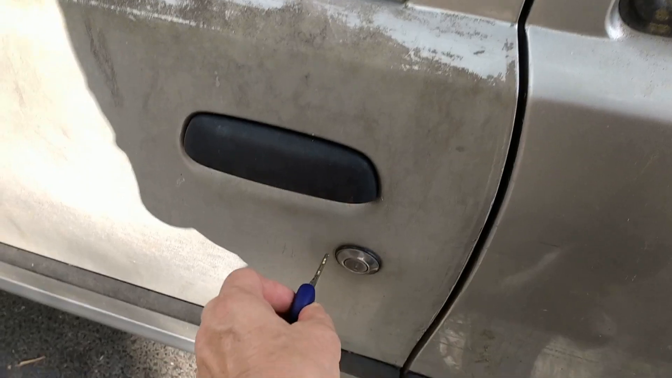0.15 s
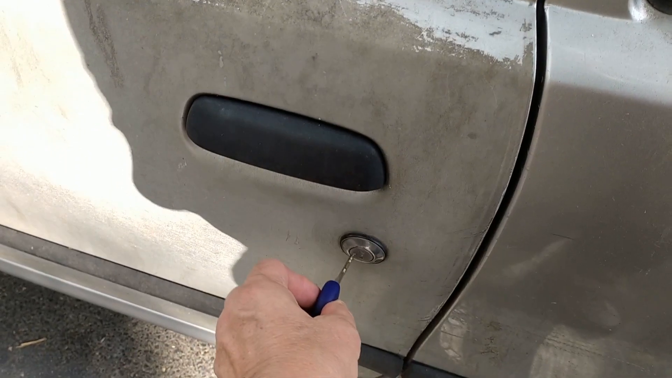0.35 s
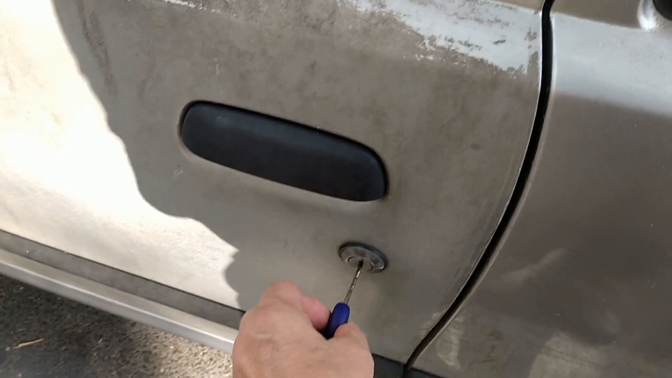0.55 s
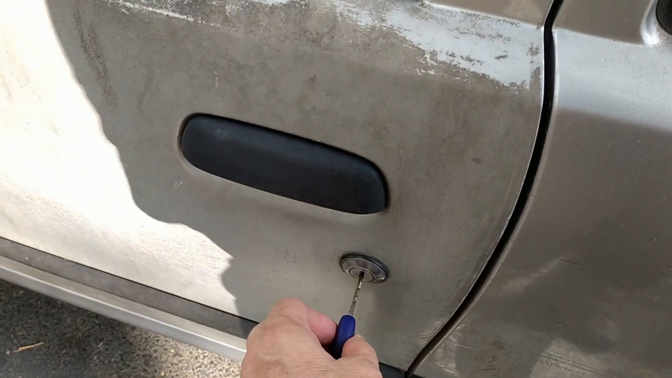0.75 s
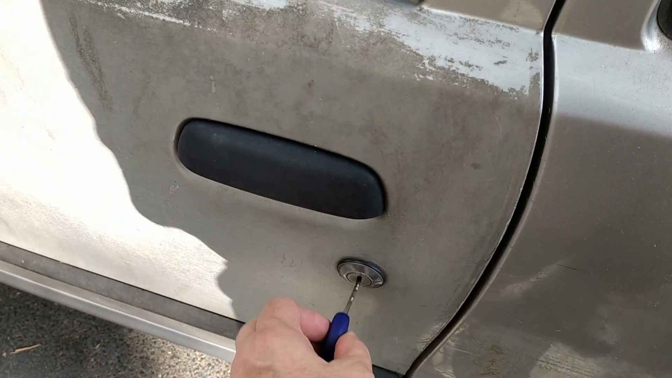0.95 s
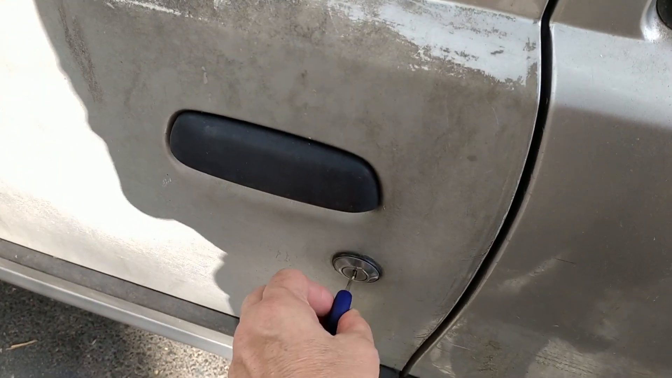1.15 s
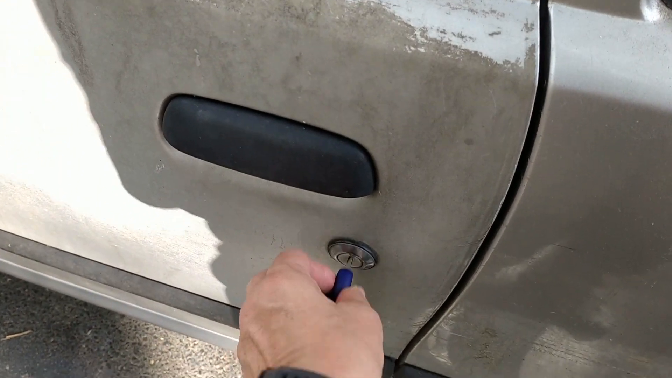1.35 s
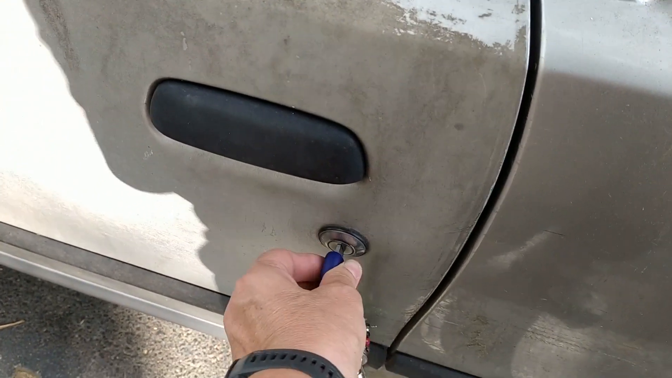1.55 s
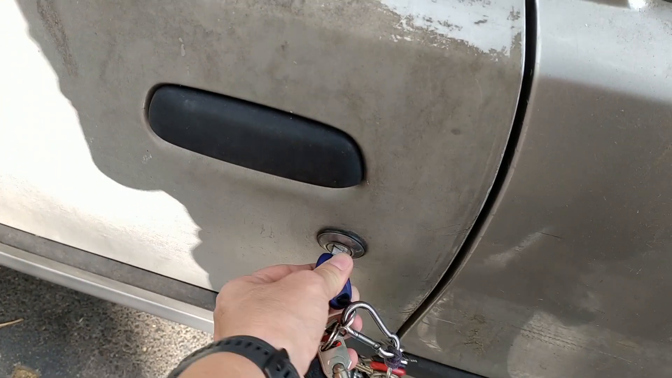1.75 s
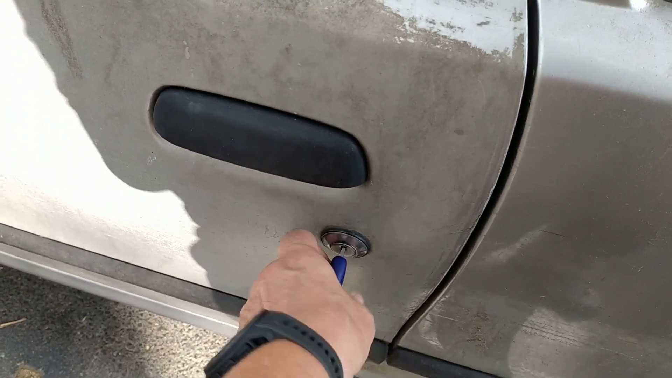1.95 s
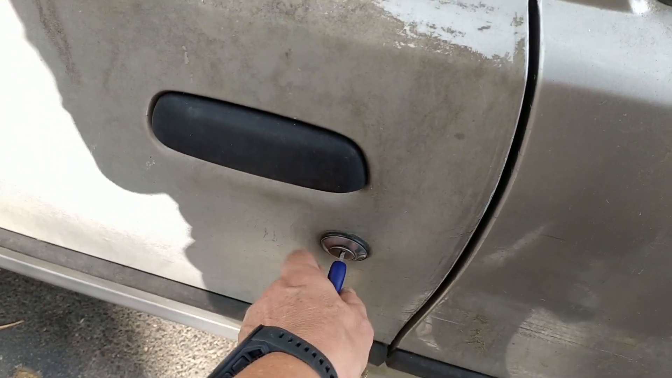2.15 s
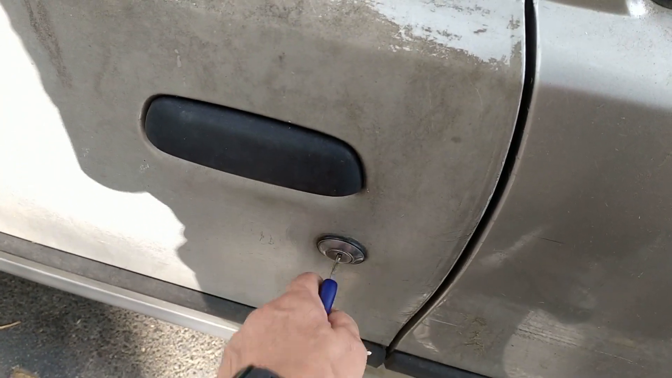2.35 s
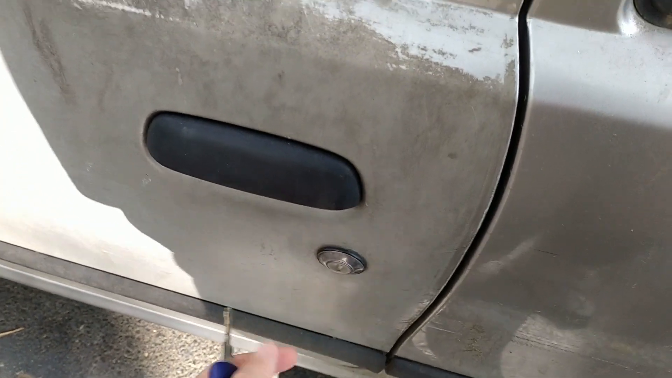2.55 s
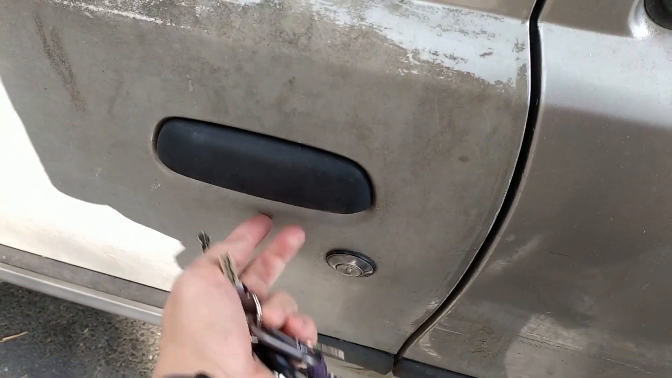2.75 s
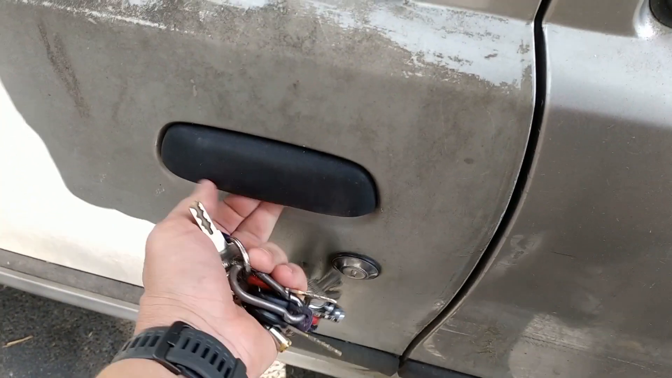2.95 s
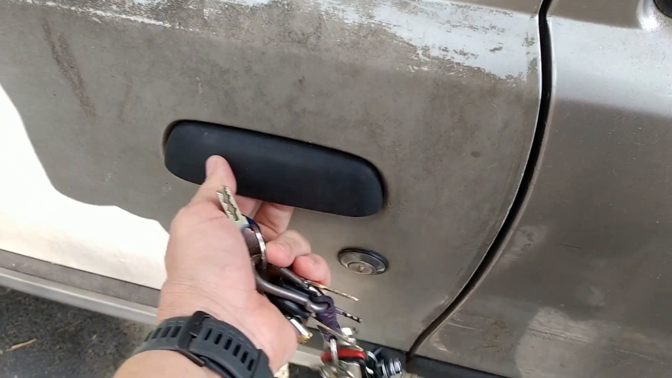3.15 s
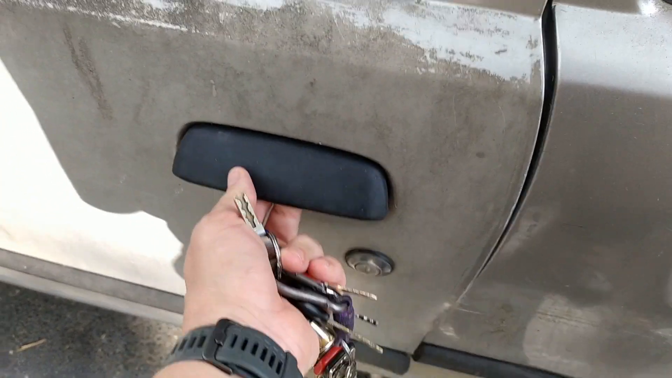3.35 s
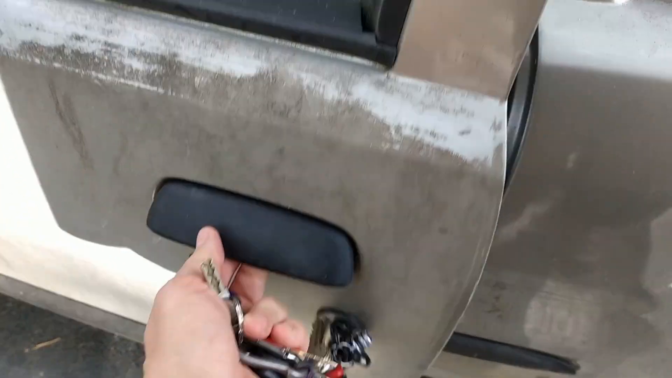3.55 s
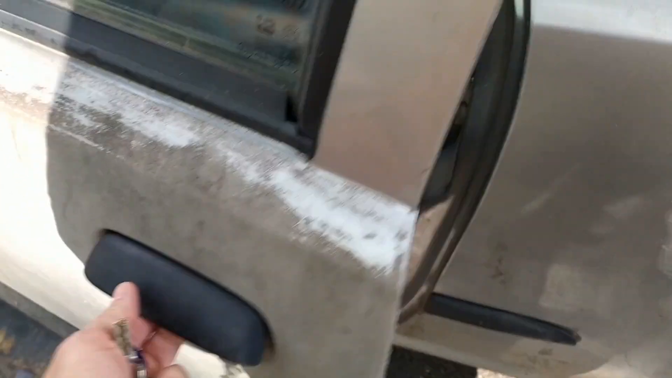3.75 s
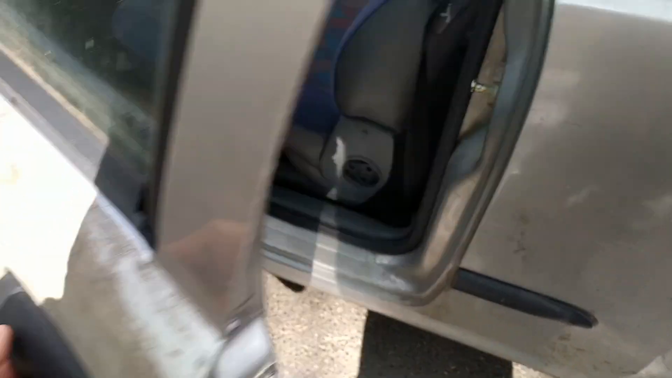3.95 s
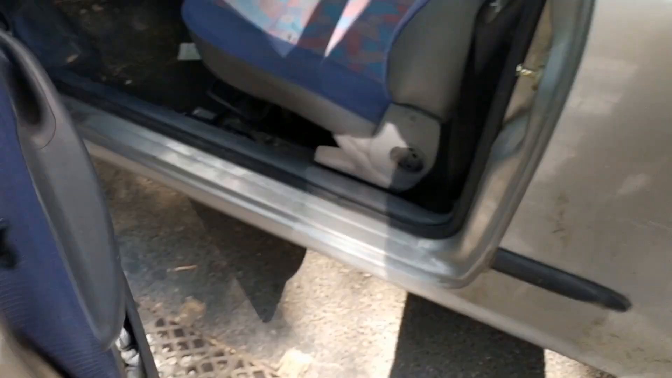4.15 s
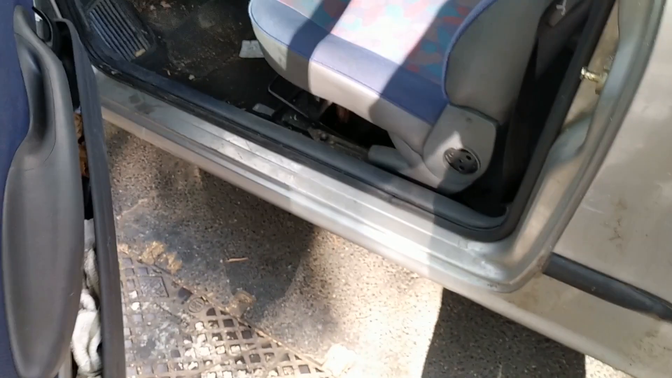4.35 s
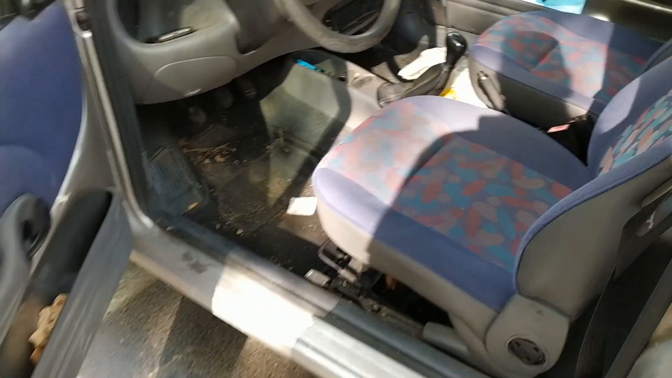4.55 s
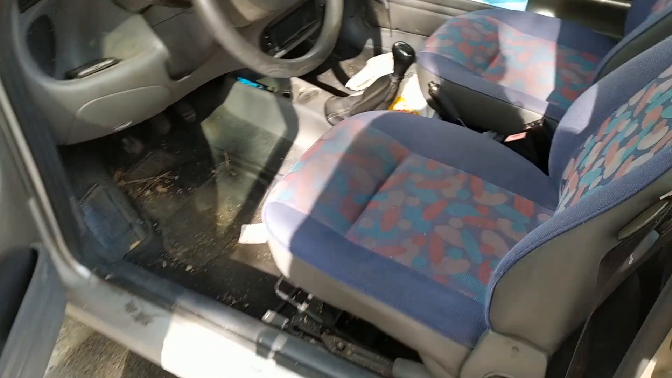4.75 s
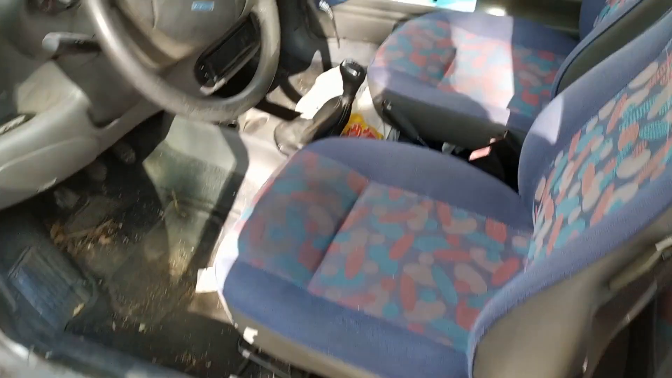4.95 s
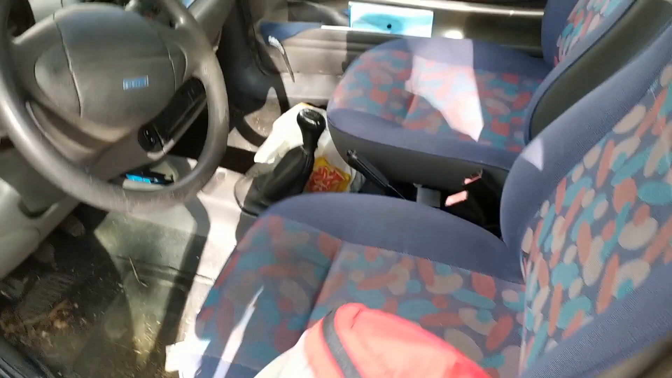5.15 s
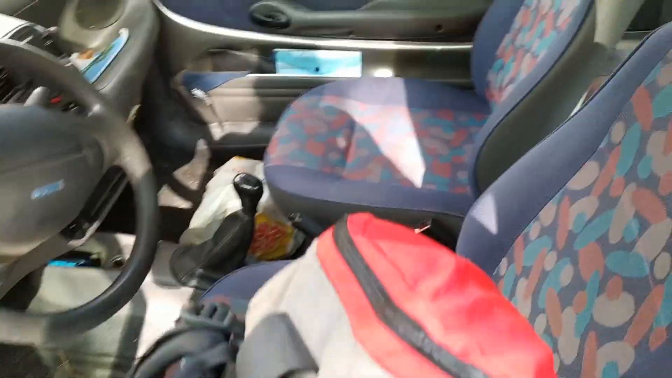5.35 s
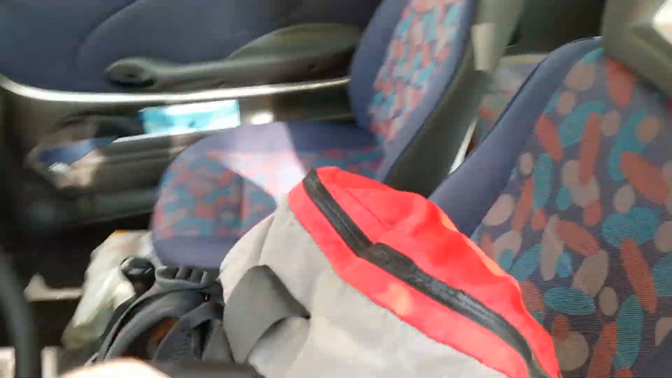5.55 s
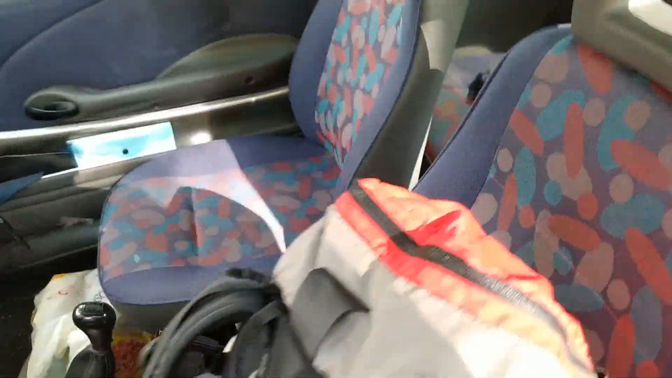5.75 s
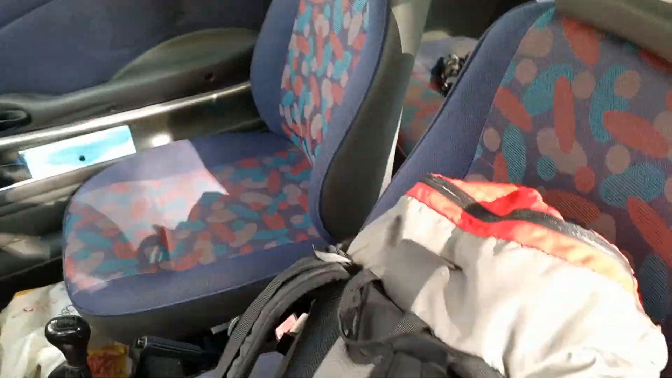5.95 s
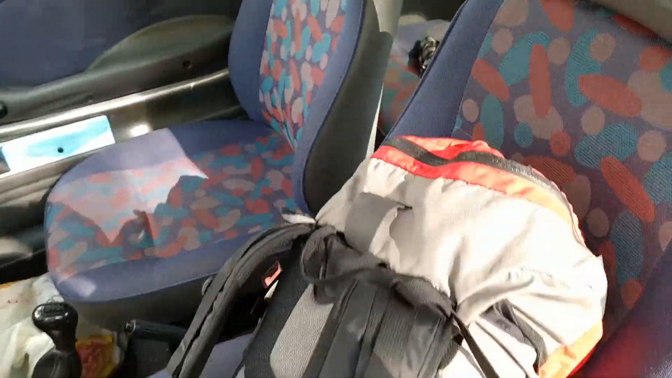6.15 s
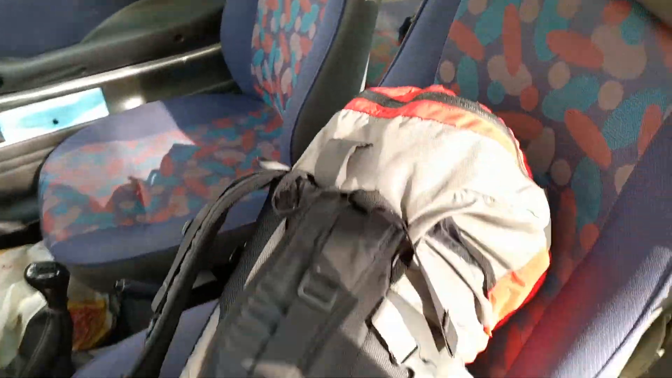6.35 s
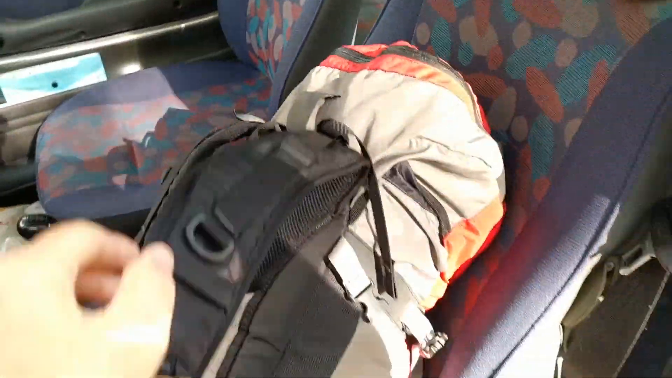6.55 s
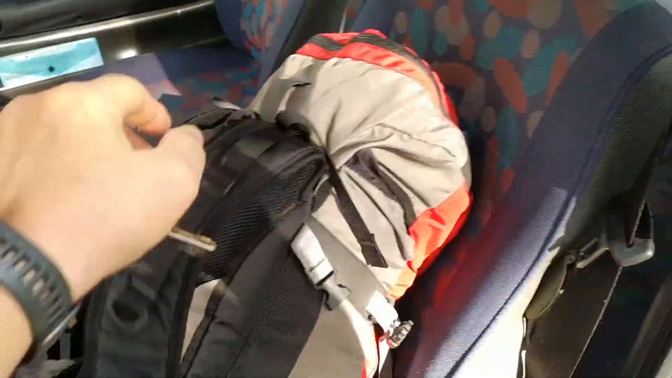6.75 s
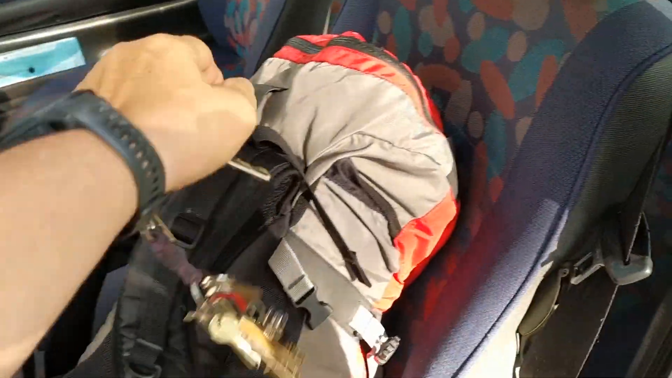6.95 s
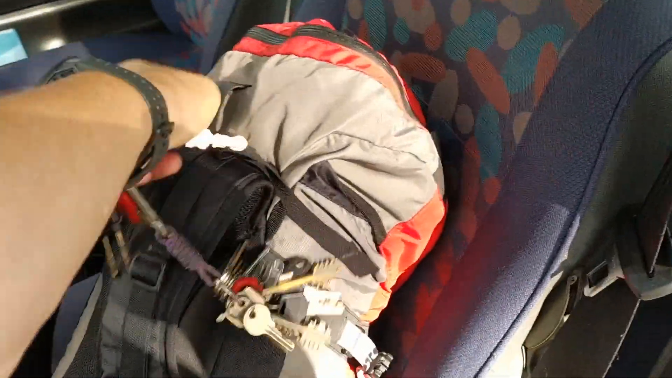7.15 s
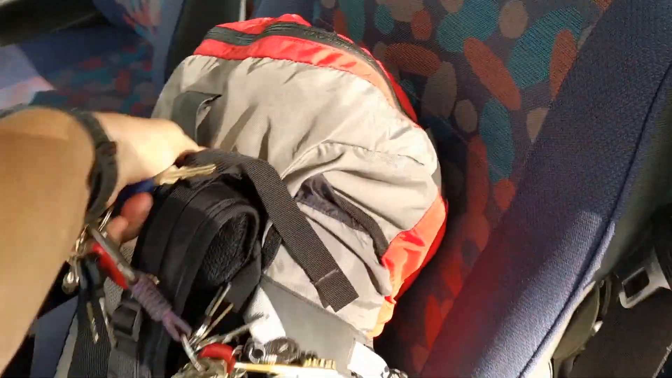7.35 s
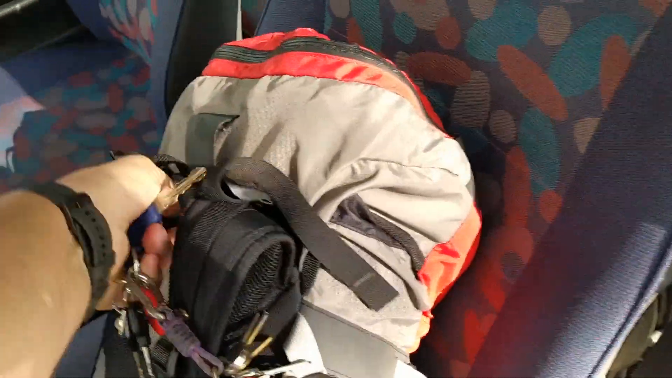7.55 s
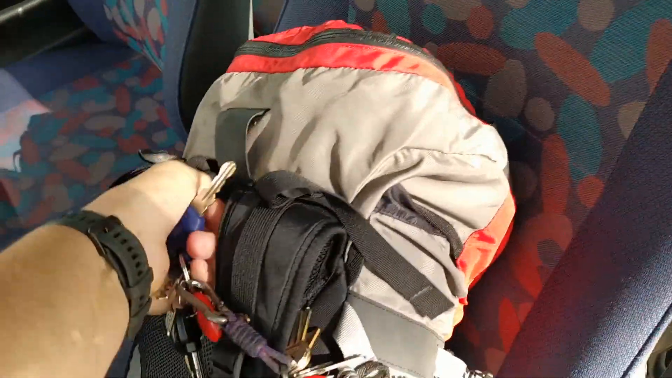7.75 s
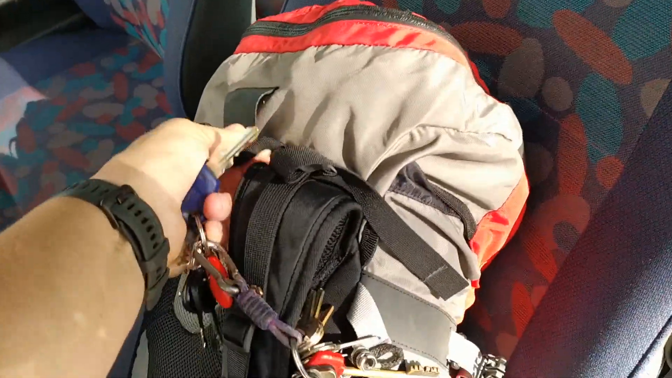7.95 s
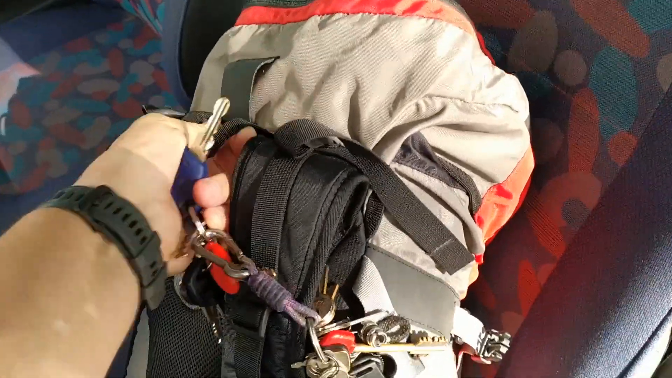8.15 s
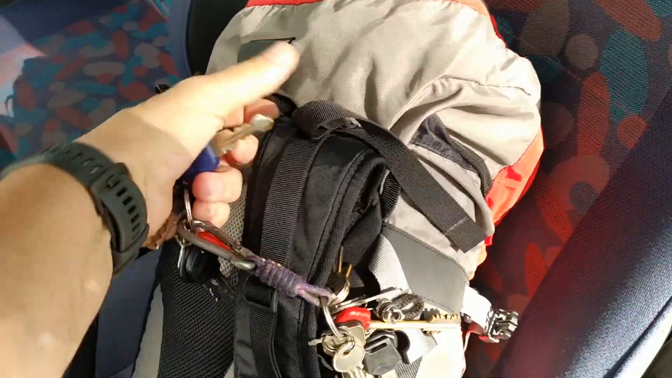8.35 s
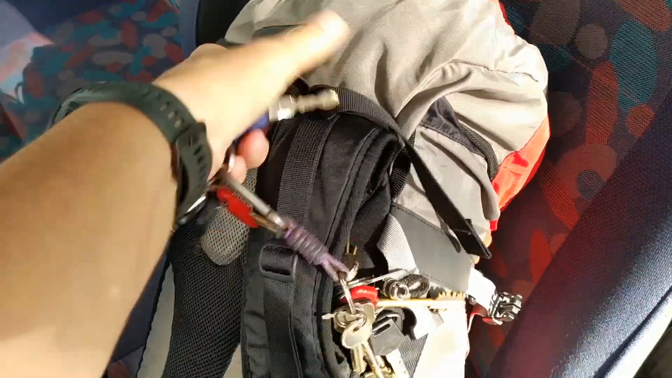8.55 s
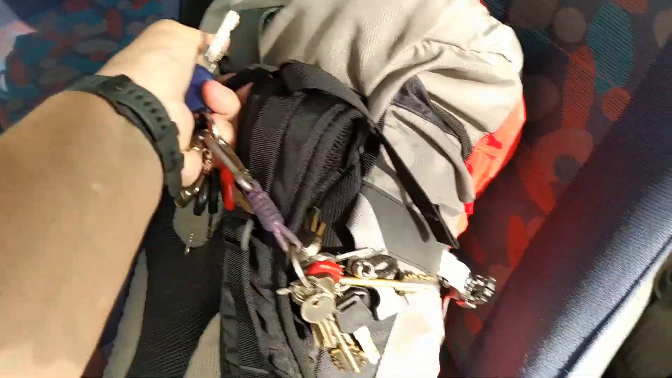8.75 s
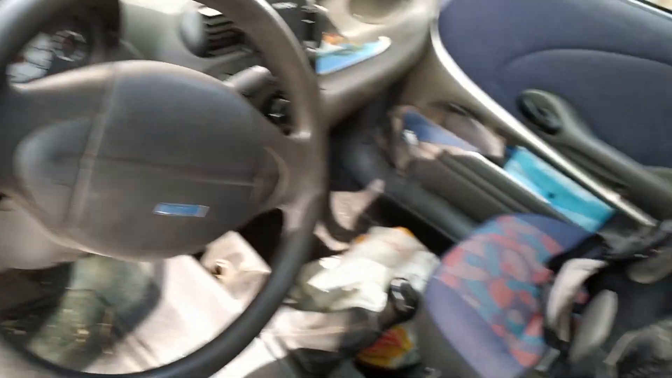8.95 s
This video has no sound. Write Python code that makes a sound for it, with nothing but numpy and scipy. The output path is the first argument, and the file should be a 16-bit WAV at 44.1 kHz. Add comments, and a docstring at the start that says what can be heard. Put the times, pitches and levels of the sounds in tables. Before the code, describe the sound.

A key ratchets into a car door lock and out, the handle clunks, the door booms open, then a seat catch snaps and keys jangle.

```python
"""At a parked car, a key slides into the door lock, turns and is drawn out; the handle trips the latch.
The door booms off its seal and swings through its check strap: touches excite sets of decaying modes.
A seat catch snaps, then a bunch of keys jangles against a rucksack, with many touches at different spots.
Swells of coloured noise make the arm, cloth and padding. Distant traffic, drone, wash and hiss as noise,
lies under it all; drone and wash, the drone most, drop on entering the car."""
import sys
import numpy as np
from scipy import signal
from scipy.fft import rfft, irfft, next_fast_len
from scipy.io import wavfile
from scipy.ndimage import uniform_filter1d

SR = 44100
rng = np.random.default_rng(int(sys.argv[2]) if len(sys.argv) > 2 else 0)


def output_pcm(signal):
    """Save a mono or channel-first signal as 16-bit PCM at the path in sys.argv[1].

    Samples are clipped to [-1, 1] before scaling.
    """
    pcm = np.clip(np.atleast_2d(signal).T, -1, 1) * 32767
    wavfile.write(sys.argv[1], SR, np.round(pcm).astype(np.int16))


N = 396089

# All table levels are relative: the sources trim them in the mix.
# The key tip finds the slot, then the blade snaps past the wafers, in and out.
# Each row: time in seconds, steel level in dB, barrel and panel level in dB, rattle in seconds.
LOCK_CLICKS = [(0.574, -46.5, -44.5, 0.0036), (1.109, -38, -49, .003), (1.124, -38, -46, .004),
               (1.248, -35.5, -40, 0.0041), (1.292, -31, -37, .005), (1.364, -32, -32, .004),
               (1.374, -45, -47, .003), (1.393, -30.5, -40, 0.0021), (1.412, -38, -41, 0.006),
               (1.446, -32, -44, 0.011), (1.467, -26, -24, 0.0031), (1.475, -43, -32.5, .005),
               (1.546, -31.5, -43.5, .003), (2.32, -33, -42.5, .003), (2.365, -39, -49, .002),
               (2.395, -40, -50, .002), (2.41, -33, -48, 0.0039), (2.428, -25, -38, 0.0056),
               (2.443, -33, -40, 0.0033), (2.467, -39, -50, .003), (2.488, -38, -49, .003),
               (2.521, -42, -48, .003)]
# The key blade grinds in and out past the wafers.
# Each row: start and end in seconds, steel grit, barrel and lock panel levels in dB.
BLADE_SCRAPES = [(1.108, 1.208, -77, -50, -41), (1.218, 1.602, -70, -57, -36), (1.38, 1.492, -59, -46, -45),
                 (2.388, 2.541, -35.5, -44, -39)]
# Lock, handle, latch and check strap hit their stops.
# Each row: time in seconds, steel, mechanism and door skin levels in dB, rattle in seconds.
DOOR_KNOCKS = [(2.01, -32.5, -33.5, -23, 0.012), (3.002, -14, -26, -33, 0.003),
               (3.0027, -18.5, -17, -25, 0.0011), (3.009, -22, -18.5, -12, 0.0051),
               (3.018, -16, -25.5, -17, 0.0075), (3.0325, -20, -19.5, -8.5, 0.0048),
               (3.041, -21, -25, -20, 0.0036), (3.051, -28, -32, -14.5, 0.015),
               (3.145, -30, -37, -53, 0.0082), (3.181, -33, -33, -26, 0.015),
               (3.573, -20.5, -26.5, -26, 0.002), (3.578, -29, -36, -40, .003),
               (3.584, -42, -26, -34, 0.0051), (3.595, -27.5, -38, -44, 0.0056),
               (3.604, -42, -35.5, -38, 0.007), (3.622, -31, -43, -38, 0.0041),
               (3.631, -32, -39, -26, 0.0064), (3.645, -36, -41, -33, 0.017), (4.14, -30, -44, -52, 0.002),
               (4.153, -37, -50, -47, .001), (4.1615, -20.5, -32.5, -39, 0.0029),
               (4.1665, -25, -33.5, -30, 0.0038), (4.176, -33, -31, -25, 0.0088),
               (4.197, -21.5, -28, -19, 0.0017), (4.202, -36, -33.5, -19, 0.003)]
# The door leaves its rubber seal. Each row: time in seconds, level in dB.
SEAL_RELEASES = [(3.362, -3)]
# Single touches of key on key. Each row: time in seconds, level in dB.
KEY_TICKS = [(1.757, -26), (1.964, -24), (1.99, -22), (2.1808, -29), (2.624, -31), (2.666, -21.5),
             (2.7275, -24), (2.792, -21), (5.252, -23), (6.245, -16.5), (6.4365, -22), (6.455, -16.5),
             (6.524, -23.5), (7.0792, 2), (7.092, -8), (7.115, -8), (7.128, -14), (7.217, -8), (7.333, -20),
             (7.433, -27), (7.574, -30), (7.8304, -22.5), (8.269, -36), (8.356, -34), (8.463, -29.5),
             (8.4966, -31), (8.507, -26), (8.633, -29), (8.671, -36), (8.7196, -31.5)]
# The whole bunch swings together and rattles out.
# Each row: time in seconds, level in dB, rattle in seconds, ring of the free-hanging keys in dB.
KEY_JANGLES = [(2.636, -22.5, 0.014, -24), (3.0642, -14, 0.015, -9), (3.177, -13, 0.015, -23),
               (3.6206, -12.5, 0.02, -14), (5.951, -36, .02, -14), (6.073, -23.5, 0.036, -16),
               (6.147, -29, 0.076, -17), (6.207, -26.5, 0.017, -1), (6.447, -16, 0.0065, -0.5),
               (6.461, -20, .009, 1), (6.638, -28.5, 0.052, -19), (6.717, -20.5, 0.037, -19),
               (6.879, -15, 0.014, -19), (7.0655, -8.5, 0.0031, -13), (7.084, -18, .011, -6),
               (7.103, -7.5, 0.048, -15), (7.158, -20, 0.021, -4), (7.179, -16.5, 0.052, -0.5),
               (7.216, -16, .007, -2), (7.252, -26, 0.013, 0), (7.286, -19, 0.023, 1.5),
               (7.3096, -17.5, .009, -1), (7.358, -23, .005, -4), (7.367, -16.5, 0.0087, -11),
               (7.447, -27, 0.016, -3), (7.483, -19, 0.011, -10), (7.5067, -16.5, 0.013, -15)]
# The steel clip of the bunch pings. Each row: time in seconds, level in dB.
CLIP_PINGS = [(2.0206, -40), (2.2767, -31.5), (2.3201, -34), (2.3654, -45)]
# The long key pings while the bunch dangles. Each row: time in seconds, level in dB.
LONG_KEY_PINGS = [(7.105, -35), (7.152, -39), (7.178, -28), (7.22, -36), (7.289, -37), (7.312, -35),
                  (7.367, -39), (7.451, -44)]
# Two loose keys chatter as the door comes to rest.
# Each row: time in seconds, level in dB, rattle in seconds.
KEY_CHATTER = [(4.392, -37, 0.024), (4.4094, -30, 0.014), (4.427, -21.5, 0.0074), (4.441, -19.5, 0.011)]
# Where the bunch hangs. Each row: time in seconds, left-right difference in dB.
KEYS_PAN = [(2.0, 4.5), (3.6, 2), (5.25, -8.5), (6.15, 5.5), (6.9, -1), (7.1, -0.5), (7.25, 1.5),
            (7.8, 7.5), (8.4, -10)]
# The seat catch is pressed, snaps and settles.
# Each row: time in seconds, steel, mechanism and frame levels in dB, rattle in seconds.
CATCH_SNAPS = [(5.374, -55, -39, -39, 0.0041), (5.393, -11.5, -18.5, -53, 0.0048),
               (5.471, -37, -59, -70, 0.0024)]
# Plastic buckles of the rucksack knock or are hit.
# Each row: time in seconds, click, buckle and seat frame levels in dB, rattle in seconds.
BUCKLE_KNOCKS = [(5.655, -29, -36.5, -35.5, 0.011), (5.757, -26.5, -37.5, -38.5, 0.004),
                 (6.716, -29, -46.5, -55, .002), (6.868, -33, -35, -48, 0.0043),
                 (7.0825, -15.5, -27.5, -30, 0.0035), (7.094, -19, -33, -36, 0.009)]
# Rucksack fabric and straps are pushed about. Each row: time in seconds, swish and thud levels in dB.
CLOTH_PUSHES = [(5.658, -53, -32), (5.761, -44, -47), (5.885, -58, -41), (5.947, -62, -36),
                (6.041, -46.5, -38.5), (6.085, -51, -48), (6.885, -42, -50), (6.94, -46, -48),
                (7.355, -48, -43.5), (7.734, -47, -57), (7.874, -46.5, -40), (8.457, -50, -60),
                (8.565, -48, -48)]
# Arm movements: key in, turn and withdraw, reach for the handle, pull, swing the door, let go, lean in,
# reach for the rucksack, pull it closer, drop the bunch on it, feel along the straps.
# Each row: start and end in seconds, rumble, rubbing and shuffle levels in dB.
MOVES = [(1.05, 1.875, -61, -49, -59), (1.884, 2.91, -52.5, -50, -59), (2.81, 3.332, -54, -47, -46.5),
         (3.352, 4.027, -73, -47, -54), (4.096, 4.503, -67, -49.5, -62), (4.56, 4.726, -78, -73, -49),
         (5.07, 5.68, -84, -55, -49.5), (5.75, 6.517, -60, -54, -48.5), (6.393, 6.86, -47, -61, -54),
         (6.883, 7.62, -57, -51.5, -43.5), (7.48, 9.29, -59.5, -61, -54.5)]

# Crowds of close modes in each struck part. Each row: frequency in Hz, level in dB per Hz.
SKIN_CROWD = [(59, -48), (100, -57), (209, 1), (295, -7.5), (406, -3.5), (453, -17), (498, -5.5),
              (650, -11), (840, -15), (1430, -120)]
MECHANISM_CROWD = [(320, -23), (550, -10.5), (698, -17), (780, 1.5), (886, -3), (1300, -3.5), (1860, 0.5),
                   (2250, -2.5), (2600, 1), (3050, -11.5), (4200, -13.5), (5460, -21), (9240, -120)]
BARREL_CROWD = [(320, -25), (600, -14), (1000, 1), (1300, -1), (1900, -9), (2200, 0), (2600, -9),
                (3100, -15), (4200, -18), (9000, -70)]
# The panel around the lock, with the same columns: frequency in Hz, level in dB per Hz.
MOUNT_CROWD = [(70, -38), (130, 1), (195, 3), (290, -6), (400, -5), (520, -34), (1000, -60)]
STEEL_CROWD = [(2240, -18.5), (3800, -2.5), (5290, -1.5), (7360, 3.5), (8060, 1), (8720, 6), (10400, 6),
               (12500, -7.5), (13700, -10), (16000, -29)]
SEAL_CROWD = [(59, -30), (110, -14), (260, 2), (440, -7), (570, -10), (830, 5.5), (1060, -13), (1400, -6.5),
              (2130, -6.5), (3120, -34), (4980, -21), (5770, -28), (9410, -23.5), (10200, -14),
              (13500, -53)]
# The deep boom of the whole door shell, again: frequency in Hz, level in dB per Hz.
BOOM_CROWD = [(15, -30), (35, -7), (85, 3), (120, -9), (190, -2), (290, -17), (450, -22), (900, -38),
              (2000, -80)]
CATCH_CROWD = [(250, -23), (550, -12.5), (1120, 4.5), (1650, -5), (2250, -1), (3000, -7), (3500, -10),
               (6000, -40)]
KEYS_CROWD = [(3240, -8), (5500, -34), (5920, -14), (7550, 1), (8240, -1.5), (10300, 4.5), (11200, 2.5),
              (12500, -10), (13100, -29), (16100, -41), (16500, -36)]

# Resonances that stand out. Each row: frequency in Hz, width in Hz at damping 1, level in dB.
SKIN_MODES = [(172, 22, -5), (202, 24, 0), (285, 28, -5), (419, 34, 0), (490, 24, 4)]
SHELL_MODES = [(68, 7, 4), (88, 12, 6), (165, 14, -3), (199, 15, 1), (232, 16, -4), (293, 34, -4),
               (405, 26, -6), (460, 30, -10), (673, 40, -8), (832, 45, -7)]
MECHANISM_MODES = [(540, 50, -7), (830, 60, -2), (1090, 130, -9), (1270, 110, 0), (1412, 24, 3),
                   (1668, 35, -2), (2200, 45, -1), (2270, 24, 3), (2501, 27, 1), (2587, 35, -4),
                   (2723, 20, -2), (3950, 150, -16), (4260, 130, -15)]
CATCH_MODES = [(1146, 70, 2), (1370, 85, -10), (2205, 99, 1), (2320, 94, -5)]
BARREL_MODES = [(1270, 110, 0), (1412, 30, -1), (2230, 90, -2)]
MOUNT_MODES = [(194, 50, 0), (393, 28, -5)]
STEEL_MODES = [(5500, 72, -48), (7600, 210, -2), (7960, 38, -41), (8950, 51, -1), (11300, 32, 14),
               (11150, 340, 30), (10840, 44, 32), (13000, 140, -4), (12300, 140, 30), (14800, 55, 0)]
KEY_MODES = [(6790, 50, 0), (7450, 40, -5), (8007, 30, -2), (8270, 25, 3), (8445, 40, -3), (8545, 40, -1),
             (8645, 40, -2), (8872, 35, 0), (9010, 45, 0), (9300, 70, -3), (9845, 35, 0), (9961, 40, -1),
             (10432, 40, -2), (10799, 13, 10), (10913, 18, 6), (10969, 25, 1), (11327, 18, 7),
             (11799, 30, -2), (12047, 18, 5), (12400, 60, -7), (12920, 60, -7), (13770, 60, -8),
             (15020, 47, -7), (15610, 80, -9)]
LONG_KEY_MODES = [(5730, 45, 0), (5950, 70, -5), (6280, 60, -8)]
CLIP_MODES = [(6598, 21, -3), (9750, 16, 0), (12320, 42, -10)]
LOOSE_KEY_MODES = [(6660, 83, -13), (8160, 34, -19), (8950, 25, 1), (9800, 27, -14), (10900, 23, 2),
                   (11700, 38, -11), (14800, 37, -5), (15800, 64, -13)]

# Noise colours of cloth, arm and outdoors. Each row: frequency in Hz, level in dB per Hz.
NYLON = [(350, -44), (600, 3), (686, -23), (800, -16), (1130, -6.5), (2980, -5.5), (3440, -12.5),
         (7000, -10), (9100, -37), (15400, -120)]
PADDING = [(59, -32), (100, -44), (254, -2.5), (412, -1), (659, -22), (806, 0), (1100, -7), (1430, -55),
           (2420, -120)]
RUSTLE = [(3530, -49), (6000, -21), (7770, -3.5), (10600, 2.5), (11200, 0.5), (12600, -31), (13600, -13),
          (15400, -38), (16000, -41)]
RUMBLE = [(12, -33), (20, -1.5), (55, -5), (72, -48), (120, -120)]
# The deep flutter of a moving arm and sleeve, again: frequency in Hz, level in dB per Hz.
FLUTTER = [(30, -5), (55, -13.5), (85, -4.5), (125, -7), (180, -13), (280, -30), (500, -68)]
RUBBING = [(65, -50), (110, -11.5), (140, -8.5), (182, 0.5), (261, -3.5), (318, -6), (409, -5.5),
           (513, -9.5), (560, -33), (730, -49), (1230, -120)]
AIR = [(280, -25), (480, -1), (736, -5), (930, -5), (1370, -8), (2120, -5.5), (2760, -15), (3300, -23),
       (4290, -53), (7260, -120)]
HISS = [(1650, -17.5), (2800, 1.5), (3170, -5.5), (3940, 1.5), (4270, 7), (4910, 2), (7020, 3), (7890, 0),
        (8480, 1.5), (10600, 0), (11700, -12), (12700, -17), (16000, -38)]
DRONE = [(29, -36), (50, 1), (70, 11.5), (108, -7), (125, 2), (160, -45), (280, -120)]
# Likeness of the two channels. Each row: frequency in Hz, likeness from -1 to 1.
LIKENESS = [(60, .88), (130, .94), (290, .87), (640, .5), (1400, -.05), (3100, .02), (15000, 0)]
# Stereo tilt of the colours. Each row: frequency in Hz, left-right difference in dB.
BALANCE = [(100, 0.5), (700, -1), (1400, 3.5), (2400, 4), (4400, -3.5), (7000, 2), (9500, -2.5), (11200, 9),
           (15000, 0)]

RING_SIZE = 16384  # samples in one struck sound
LEAD_S = .014  # room for grazing touches ahead of the main one
AGE = np.arange(RING_SIZE) / SR
TIME = np.arange(N) / SR
SLIPS_PER_S = 1100  # of the key blade in the barrel
HARD_BLOW_DB, CRACK_GROWTH = -20, 1.5  # dB of crack per dB of blow, around a hard blow
KEY_LOW_CUT_HZ = 4600  # the keys sound nothing lower
SEAT_LOW_CUT_HZ = 123  # the seat's clicks and snaps carry no deep bass
PUSH_FADE_S = 0.021
BRISK_DB, CLINKS_PER_S, CLINK_RATE_LAW = -45.5, 200, 0.77  # brisk shuffle; rate goes as motion ** law
CLINK_DB, CLINK_SPREAD_DB, SLIDE_DB = -47, 4, -1  # clinking, its unevenness; cloth against the shuffle
RUSTLE_UNEVEN_DB = 2.5  # folds catch and let go
REST_RUMBLE_DB, REST_RUBBING_DB, REST_SHUFFLE_DB = -59.5, -54.5, -73.5  # the hand held still
FLUTTER_DB = -1
# Distant traffic in the open, then the car's screening once the listener is in the doorway.
DRONE_DB, WASH_DB, ROAR_DB = -53, -49, -52
DRONE_SCREEN_DB, WASH_SCREEN_DB, ENTER_S, ENTER_LENGTH_S = -10.5, -7.5, 4.51, 0.1
CUTOFF_HZ = 17100


def door():
    """Lock, latch and check strap sound through the hollow steel door."""
    skin = body(SKIN_CROWD, SKIN_MODES, t60=.1, modes_db=0, damping=.6, tail_db=-9, tail_t60=.35)
    works = body(MECHANISM_CROWD, MECHANISM_MODES, t60=0.045, modes_db=-2, damping=1,
                 tail_db=-20, tail_t60=0.17)
    steel = body(STEEL_CROWD, STEEL_MODES, t60=.018, modes_db=-5, damping=1.8, tail_db=-19, tail_t60=.15)
    barrel = body(BARREL_CROWD, BARREL_MODES, t60=.035, modes_db=-4, damping=1.2,
                  tail_db=-22, tail_t60=.17)
    mount = body(MOUNT_CROWD, MOUNT_MODES, t60=.08, modes_db=3, damping=1, tail_db=-15, tail_t60=.25)
    # one level drives both the barrel and the panel around it
    clicks = [(s, steel_db, barrel_db, barrel_db, rattle_s)
              for s, steel_db, barrel_db, rattle_s in LOCK_CLICKS]
    lock = knocks(clicks, mount, barrel, steel, panel_db=-9.5, works_db=3.0, steel_db=-1.0,
                  crack_db=-20.0, lag_s=.0015)
    latch = knocks(DOOR_KNOCKS, skin, works, steel, panel_db=-11.5, works_db=3.0, steel_db=-0.9,
                   crack_db=-16.5, lag_s=.0015, per_s=1400, count=2)
    return scrapes(mount, barrel, steel) + lock + latch


def scrapes(mount, barrel, steel):
    """Dense tiny slips of the blade hiss in the barrel and drum in the panel around the lock."""
    slips = (rng.random(N) < SLIPS_PER_S / SR) * rng.standard_normal(N)
    grit, grind, drum = (rms_one(excited(part, slips)) for part in (steel, barrel, mount))
    out = 0
    for start, end, grit_db, barrel_db, panel_db in BLADE_SCRAPES:
        layers = from_db(grit_db) * grit + from_db(barrel_db) * grind + from_db(panel_db) * drum
        out = out + swell(start, end) * layers
    return out


def door_release():
    """The seal lets go with a short stutter and the whole shell booms."""
    seal = body(SEAL_CROWD, SHELL_MODES, t60=0.014, modes_db=-12, damping=2.8, tail_db=-26, tail_t60=0.21)
    shell = body(BOOM_CROWD, SHELL_MODES, t60=0.3, modes_db=5, damping=0.65, tail_db=-15, tail_t60=.5)
    out = np.zeros((2, N))
    for s, level_db in SEAL_RELEASES:
        first = strike(seal, contacts(0.0044, per_s=1100, rebound=0.66))
        add(out, s - .002 - LEAD_S, from_db(level_db - 15.5) * first)
        second = strike(seal, contacts(0.0046, per_s=810, rebound=1.0), count=4)
        add(out, s + 0.0032 - LEAD_S, from_db(level_db - 11.5) * second)
        boom = strike(shell, signal.unit_impulse(RING_SIZE))
        add(out, s + 0.00705, from_db(level_db - 12.5) * boom)
    return out


def keys():
    ticks = body(KEYS_CROWD, KEY_MODES, t60=.006, modes_db=-2, damping=3, tail_db=-17, tail_t60=.08,
                 spot_db=6, scatter_hz=250)
    bunch = body(KEYS_CROWD, KEY_MODES, t60=.003, modes_db=11, damping=1.3, tail_db=-26, tail_t60=.15,
                 spot_db=8, scatter_hz=300)
    hanging = body(KEYS_CROWD, KEY_MODES, t60=.003, modes_db=18, damping=.7, tail_db=-26, tail_t60=.15,
                   spot_db=5)
    pair = body(KEYS_CROWD, LOOSE_KEY_MODES, t60=0.006, modes_db=5, damping=1.7, tail_db=-26, tail_t60=.1)
    pan_s, pan_db = np.transpose(KEYS_PAN)
    out = pings(CLIP_PINGS, CLIP_MODES) + pings(LONG_KEY_PINGS, LONG_KEY_MODES)
    for s, level_db in KEY_TICKS:
        tick = strike(ticks, contacts(0.0028, per_s=700, rebound=1.0))
        sides = panned(np.interp(s, pan_s, pan_db))
        add(out, s + 0.0029 - LEAD_S, from_db(level_db - 10.5) * sides * tick)
    for s, level_db, rattle_s, ring_db in KEY_JANGLES:
        # rebounds are dealt among six spots, each bringing out other modes
        touches = contacts(rattle_s, per_s=320, rebound=0.9)
        jangle = strike(bunch, touches, count=6) + from_db(ring_db) * strike(hanging, touches)
        sides = panned(np.interp(s, pan_s, pan_db))
        add(out, s + 0.0031 - LEAD_S, from_db(level_db - 10.0) * sides * jangle)
    for s, level_db, rattle_s in KEY_CHATTER:
        chatter = strike(pair, contacts(rattle_s, per_s=1000, rebound=1.0))
        add(out, s + 0.00094 - LEAD_S, from_db(level_db - 5.5) * chatter)
    return low_cut(out, KEY_LOW_CUT_HZ, order=4)


def pings(rows, modes):
    """One clean touch leaves a free piece of metal ringing, one sample later on the right."""
    hz, width, mode_db = np.transpose(modes)[:, :, None]
    right_delay = np.exp(-2j * np.pi * hz.T * [[0], [1]] / SR)
    out = np.zeros((2, N))
    for s, level_db in rows:
        strengths = from_db(level_db + mode_db + rng.normal(0, 1, hz.shape))
        lines = strengths * np.exp(np.pi * (2j * hz - width) * AGE)
        add(out, s, np.imag(right_delay @ lines))
    return out


def seat():
    """The steel catch snaps and rings in the padded cabin; the plastic buckles only clack."""
    frame = body(SKIN_CROWD, SKIN_MODES, t60=0.43, modes_db=-6.5, damping=2.2, tail_db=-4, tail_t60=0.2)
    catch = body(CATCH_CROWD, CATCH_MODES, t60=0.025, modes_db=0, damping=1.0, tail_db=-14, tail_t60=.16,
                 spot_db=1)
    buckle = body(MECHANISM_CROWD, MECHANISM_MODES, t60=0.017, modes_db=-41.0, damping=1.7,
                  tail_db=-18, tail_t60=0.4)
    steel = body(STEEL_CROWD, STEEL_MODES, t60=0.025, modes_db=-31, damping=1.8,
                 tail_db=-12.0, tail_t60=0.13)
    snaps = knocks(CATCH_SNAPS, frame, catch, steel, panel_db=-0.5, works_db=3.0, steel_db=-2.5,
                   crack_db=-19.0, lag_s=0.00093, rebound=0.49)
    clacks = knocks(BUCKLE_KNOCKS, frame, buckle, steel, panel_db=-5.0, works_db=0.5, steel_db=-5.5,
                    crack_db=-25, lag_s=0.001256)
    return low_cut(snaps + clacks, SEAT_LOW_CUT_HZ, order=2)


def rucksack():
    """Each push swells and fades: the padding thuds, the weave catches in a grainy swish."""
    thud, swish = 0, 0
    for s, swish_db, thud_db in CLOTH_PUSHES:
        since = TIME - s - .005
        push = np.exp(-np.where(since < 0, -since / 0.011, since / PUSH_FADE_S))
        thud = thud + from_db(thud_db - 8.0) * push
        swish = swish + from_db(swish_db + 0.5) * push
    # a high power leaves sparse peaks: the grain of the weave
    weave = rms_one(uniform_filter1d(rng.random(N) ** 12, size=60))
    return thud * noise(PADDING) + swish * weave * noise(NYLON)


def shuffle(count=8):
    """In gentle motion cloth slides; brisk motion shakes the keys into more and louder clinks."""
    motion = effort(REST_SHUFFLE_DB, column=4)
    brisk = motion / from_db(BRISK_DB)
    pan_db, = in_time(KEYS_PAN)
    # keys held in the hand are damped, and each touch finds one of several spots
    held = body(KEYS_CROWD, KEY_MODES, t60=.008, modes_db=3, damping=3.5, tail_db=-18, tail_t60=.1,
                spot_db=8, scatter_hz=400)
    uneven_db = CLINK_SPREAD_DB * np.minimum(rng.exponential(1, N), 3.5)
    # rate and size together make the clink level follow the motion
    sizes = from_db(uneven_db) * brisk ** (1 - CLINK_RATE_LAW / 2)
    touched = rng.random(N) < CLINKS_PER_S * brisk ** CLINK_RATE_LAW / SR
    spot = rng.integers(count, size=N)
    clinks = 0
    for k in range(count):
        clinks = clinks + excited(held, touched * sizes * (spot == k))
    clinks = rms_one(clinks) * np.sqrt(np.mean(brisk ** 2))
    folds = rms_one(uniform_filter1d(uniform_filter1d(rng.standard_normal(N), size=700), size=700))
    cloth = from_db(RUSTLE_UNEVEN_DB * folds) * (noise(RUSTLE) + from_db(-4.5) * noise(NYLON))
    return from_db(CLINK_DB) * panned(pan_db) * clinks + from_db(SLIDE_DB) * motion * cloth


def handling():
    """The hand rumbles and rubs against the door and the seat as the arm moves."""
    deep = from_db(2.0) * noise(RUMBLE) + from_db(FLUTTER_DB) * noise(FLUTTER)
    rub = noise(RUBBING) + from_db(-3.5) * noise(AIR)
    return effort(REST_RUMBLE_DB, column=2) * deep + effort(REST_RUBBING_DB, column=3) * rub


def surroundings():
    """Distant traffic drones and washes under a thin steady hiss; the car screens it, the bass most."""
    inside = np.clip((TIME - ENTER_S) / ENTER_LENGTH_S + .5, 0, 1)
    drone = from_db(DRONE_DB) * noise(DRONE) + from_db(ROAR_DB) * noise(RUBBING)
    wash = from_db(WASH_DB + WASH_SCREEN_DB * inside) * noise(AIR)
    return from_db(DRONE_SCREEN_DB * inside) * drone + wash + from_db(-55.0) * noise(HISS)


def knocks(rows, panel, works, steel, panel_db, works_db, steel_db, crack_db, lag_s,
           rebound=1.0, per_s=900, count=1):
    """Steel cracks, out of proportion on hard blows; then the mechanism and the panel carrying it ring."""
    out, cracks = np.zeros((2, N)), noise(STEEL_CROWD, size=RING_SIZE)
    for s, top_db, mid_db, low_db, rattle_s in rows:
        touches = contacts(rattle_s, per_s, rebound)
        hit_s = s + lag_s
        crack_gain = from_db(crack_db + CRACK_GROWTH * (top_db - HARD_BLOW_DB))
        crack = crack_gain * np.exp(-AGE / 0.00079) * rng.choice([-1, 1])
        add(out, hit_s, crack * np.roll(cracks, rng.integers(RING_SIZE), axis=1))
        add(out, hit_s - LEAD_S, from_db(top_db + steel_db) * strike(steel, touches, count))
        add(out, hit_s - LEAD_S + 0.000808, from_db(mid_db + works_db) * strike(works, touches, count))
        add(out, hit_s - LEAD_S + 0.0017, from_db(low_db + panel_db) * strike(panel, touches))
    return out


def body(spectrum, modes, t60, modes_db, damping, tail_db, tail_t60, spot_db=3, scatter_hz=0):
    """A struck object: each call of its answer is a new spot, with other mode strengths and maybe pitch."""
    hz, width, level_db = np.transpose(modes)[:, :, None]
    # broad modes start stronger, in proportion to their width
    lines = from_db(level_db) * width * np.exp(np.pi * (2j * hz - width * damping) * AGE)
    # the crowded modes die fast; a weak tail comes back from the car around them
    fade = from_db(-60 * AGE / t60) + from_db(tail_db - 60 * AGE / tail_t60)
    crowd, sides = noise(spectrum, size=8 * RING_SIZE), panned(at_hz(BALANCE, hz[:, 0]))

    def answer():
        """Ring of one spot: a fading slice of the crowd plus the standout modes."""
        start = rng.integers(crowd.shape[1] - RING_SIZE)
        # long waves reach both sides in step
        signs = np.where(hz.T < 1250, 1, rng.choice([-1, 1], sides.shape))
        strengths = sides * signs * from_db(rng.normal(0, spot_db, len(hz)))
        pitch_shift = np.exp(2j * np.pi * rng.normal(0, scatter_hz) * AGE)
        ringing = np.imag(strengths @ lines * pitch_shift)
        close_modes = rms_one(crowd[:, start:start + RING_SIZE] * fade)
        return close_modes + from_db(modes_db) * rms_one(ringing)
    return answer


def contacts(rattle_s, per_s, rebound):
    """Grazing touches lead up to the main one, then uneven rebounds die away; long rattles gather slower."""
    since = AGE - LEAD_S
    rattle_s = max(rattle_s, .0005)
    size = np.exp(-np.where(since < 0, -since / (.001 + rattle_s / 5), since / rattle_s))
    touched = rng.random(RING_SIZE) < per_s / SR
    uneven = rng.uniform(.4, 1.2, RING_SIZE) * rng.choice([-1, 1], RING_SIZE)
    touches = rebound * size * touched * uneven
    touches[round(LEAD_S * SR)] = 1  # the main touch
    return touches


def strike(answer, touches, count=1):
    """Touches, dealt to a number of spots, set a body ringing; its loudest 4 ms have rms 1."""
    spot = rng.integers(count, size=RING_SIZE)
    sound = 0
    for k in range(count):
        here = (touches * (spot == k))[None]
        sound = sound + signal.fftconvolve(answer(), here, axes=1)[:, :RING_SIZE]
    return sound / np.sqrt(uniform_filter1d(np.mean(sound ** 2, axis=0), size=176).max())


def excited(answer, clicks):
    """A long train of clicks played through a body."""
    return signal.oaconvolve(answer(), clicks[None], axes=1)[:, :N]


def swell(start, end):
    """Speed of a movement that starts and ends at rest."""
    return np.sin(np.pi * np.clip((TIME - start) / (end - start), 0, 1))


def effort(rest_db, column):
    """Gain over time from one level column of the movements, power-summed with its resting level."""
    power = sum((from_db(move[column]) * swell(move[0], move[1])) ** 2 for move in MOVES)
    return np.sqrt(from_db(rest_db) ** 2 + power)


def noise(spectrum, size=N):
    """Coloured stereo noise, alike on both sides in the bass; rms 1."""
    padded = next_fast_len(size, True)
    hz = np.fft.rfftfreq(padded, 1 / SR)
    mid, side = rfft(rng.standard_normal((2, padded)))
    alike = np.clip(at_hz(LIKENESS, hz), -1, 1)
    both = np.sqrt(1 + alike) * mid + np.sqrt(1 - alike) * side * [[1], [-1]]
    coloured = both * from_db(at_hz(spectrum, hz)) * panned(at_hz(BALANCE, hz))
    return rms_one(irfft(coloured, padded)[:, :size])


def low_cut(x, hz, order):
    """Butterworth high-pass that takes away the bass."""
    return signal.sosfilt(signal.butter(order, hz, "high", fs=SR, output="sos"), x)


def from_db(db):
    """Decibels to gain."""
    return 10 ** (np.asarray(db) / 20)


def rms_one(x):
    """Scale to rms 1."""
    return x / np.sqrt(np.mean(x ** 2) + 1e-20)


def in_time(rows):
    """The columns of a curve at every sample."""
    s, *columns = np.transpose(rows)
    return [np.interp(TIME, s, c) for c in columns]


def at_hz(points, hz):
    """Read a table on a log-frequency axis."""
    known, values = np.transpose(points)
    return np.interp(np.log(hz + 1), np.log(known), values)


def panned(pan_db):
    """Left and right gains for a level difference."""
    return from_db(np.array([[.5], [-.5]]) * pan_db)


def add(out, s, sound):
    """Mix a sound in at a time."""
    start = round(s * SR)
    out[:, start:start + sound.shape[1]] += sound[:, :N - start]


def scene():
    """Door, keys, seat and rucksack within arm's reach, over the distant surroundings."""
    car = door() + door_release() + seat()
    return car + keys() + handling() + shuffle() + rucksack() + surroundings()


def record(dry):
    """The sound opens from silence after a moment, peaks are rounded, the top is cut."""
    opened = np.clip((TIME - .066) / 0.0098, 0, 1)
    rounded = .97 * np.tanh(dry * opened / .97)
    return signal.sosfilt(signal.cheby2(14, 60, CUTOFF_HZ, fs=SR, output="sos"), rounded)


dry = scene()
out = record(dry)
output_pcm(out)
```